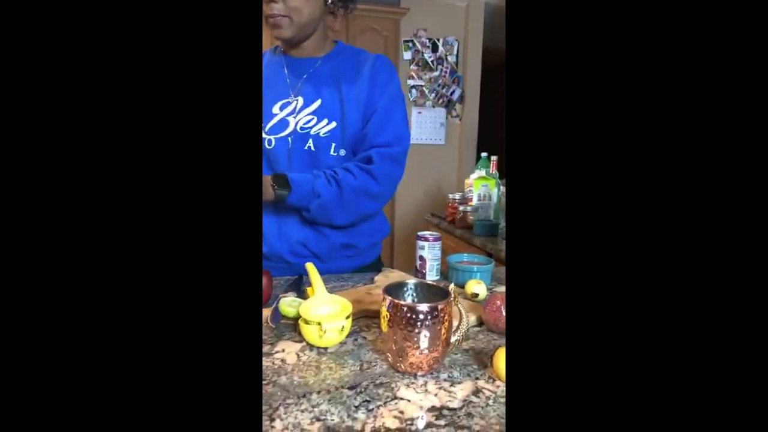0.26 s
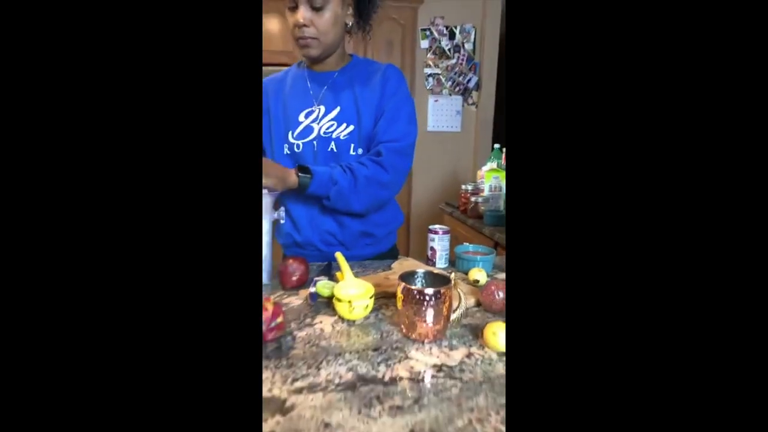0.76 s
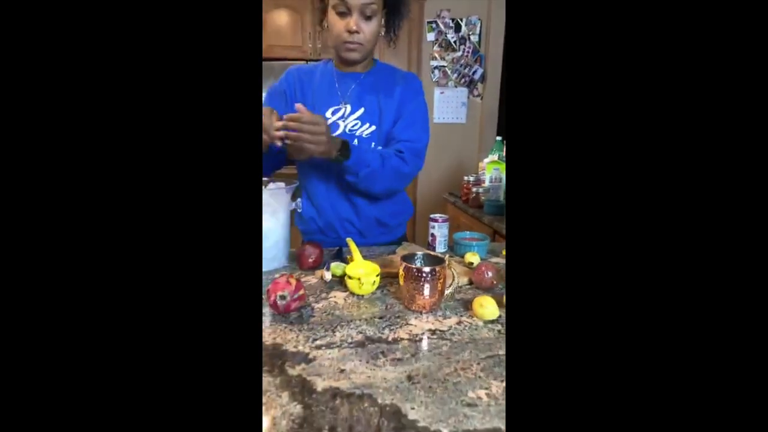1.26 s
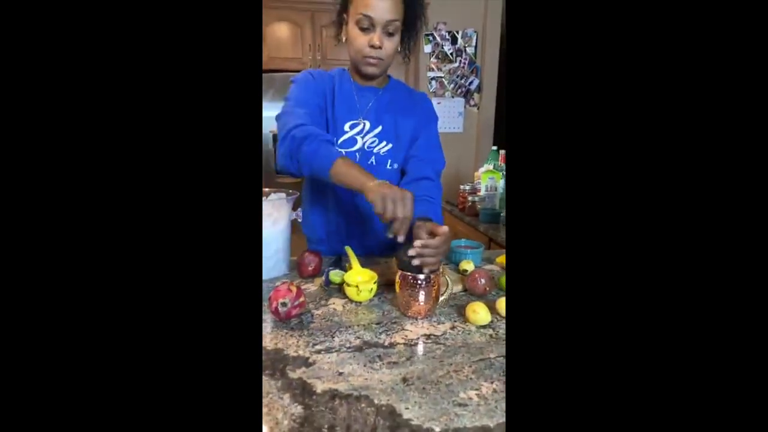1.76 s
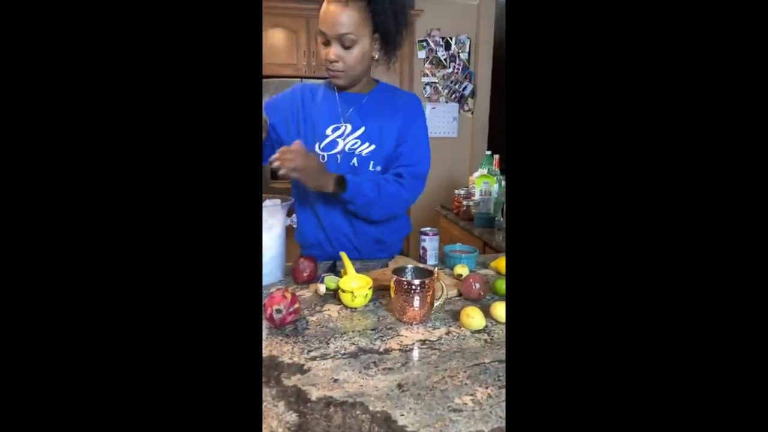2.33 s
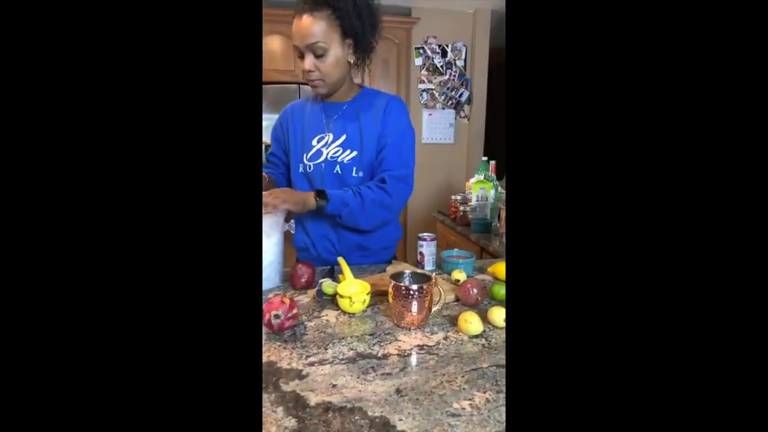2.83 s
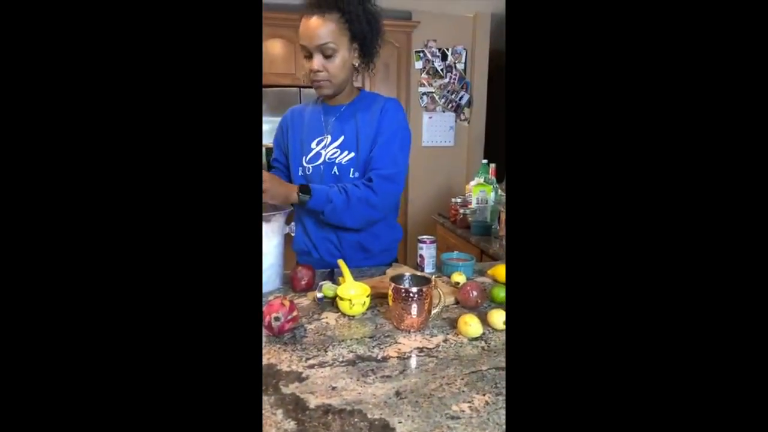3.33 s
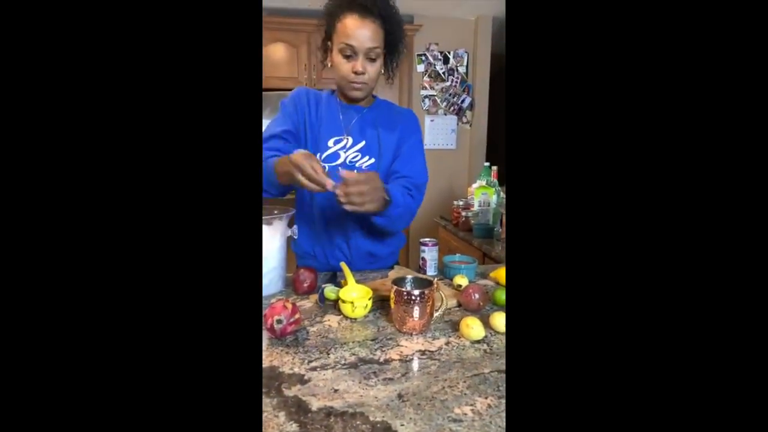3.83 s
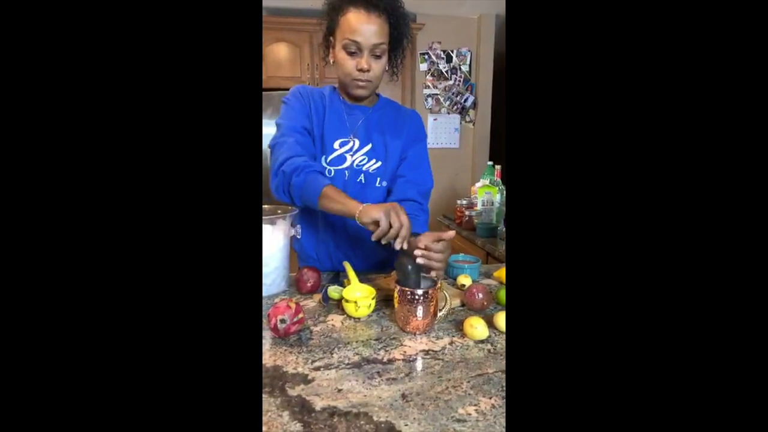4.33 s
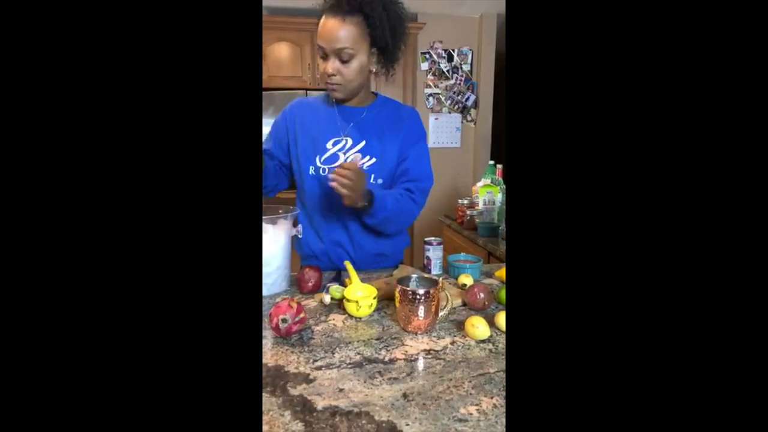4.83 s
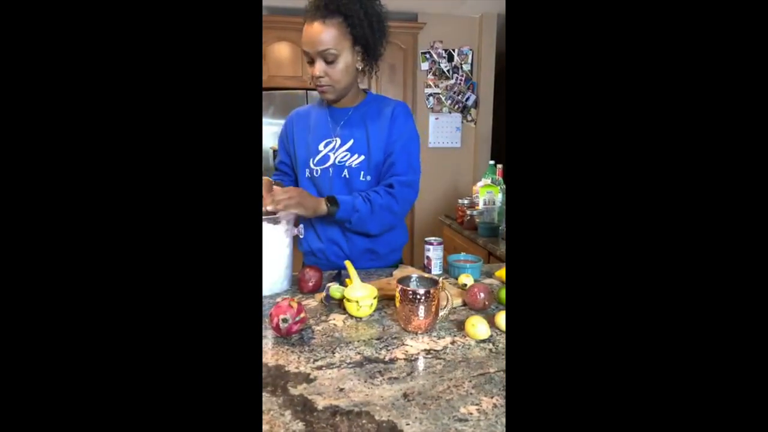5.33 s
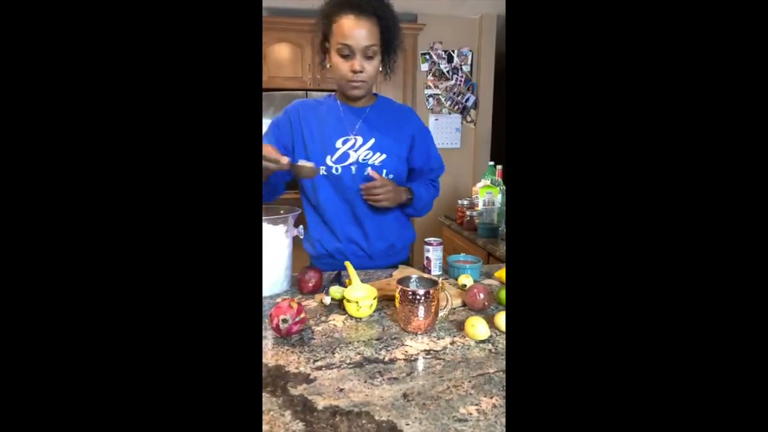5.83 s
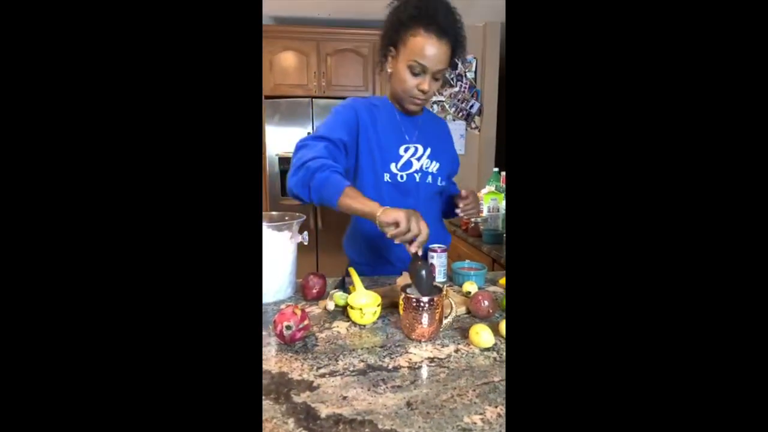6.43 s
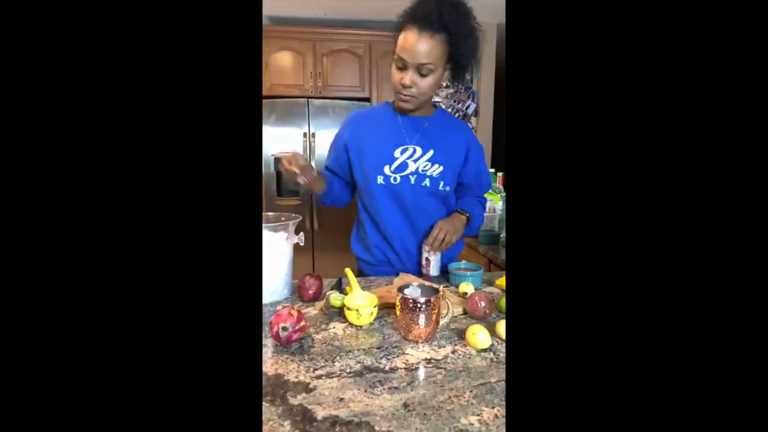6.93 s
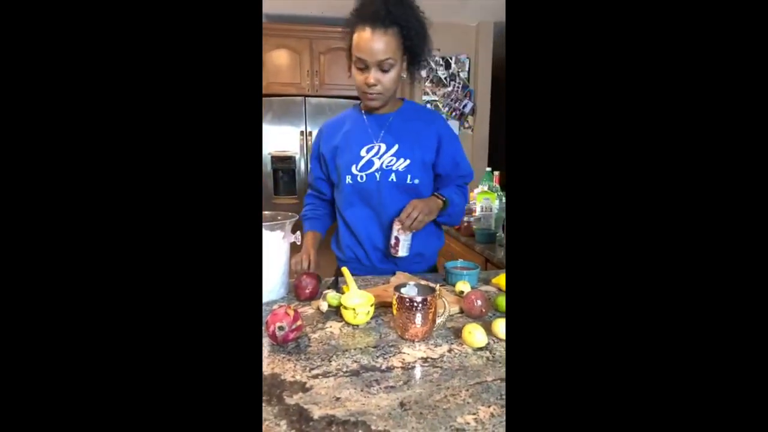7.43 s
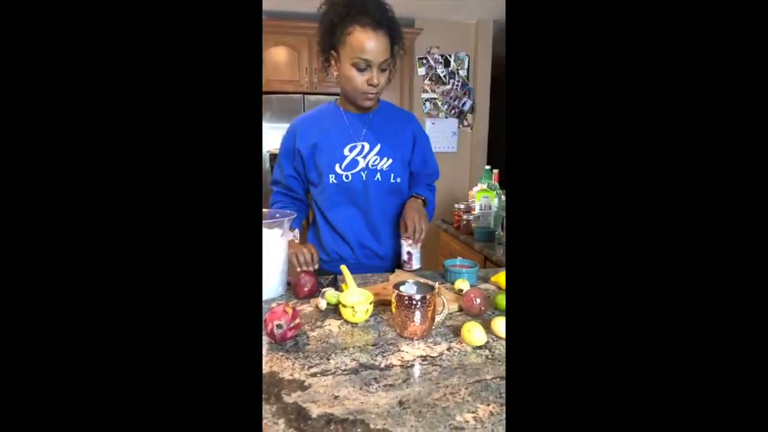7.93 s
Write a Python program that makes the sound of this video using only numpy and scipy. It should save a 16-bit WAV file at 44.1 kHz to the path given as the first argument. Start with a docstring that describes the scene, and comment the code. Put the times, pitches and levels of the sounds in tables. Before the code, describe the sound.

A low, slightly beating appliance hum and soft room rumble run throughout a reflective kitchen. From 0 to about 0.8 s a scoop crunches heavily through packed ice in a bucket a little way off, with cracking cubes and a dull wall boom; a metallic scrape and clank follow at 0.9 s and a small crunch at 1.1. At 1.8-2.1 s cubes clatter into a near, thin metal mug, bright and ringing, with a momentary dropout at the end. Digging resumes at 2.5-3.4 s. The second load hits sharply at 4.2 and rattles until 4.6. Short, crisp digs come at 4.95-5.2, with a faint stir around 5.5. A smaller, duller third load drops at 6.3-6.5, with faint settling ticks until 7. The scoop clanks at 7.3, then lands on the counter at 7.45-7.6 with a squeak and hard metallic knocks, ringing away into hum.

```python
"""A hard kitchen: a bucket of ice stands farther from the microphone than a copper mug on a stone counter.
A metal scoop digs three times into the bucket, carries each load to the mug, tips it in and is laid down.
Crunch, slide and clatter are crowds of small contacts; single blows are noise cracks with ringing modes,
squeals are wavering sines, and the room answers with decaying noise.
Beating appliance tones and shaped noise hum beneath; both channels carry the same sound."""
import sys
import numpy as np
from scipy import signal
from scipy.fft import rfft, irfft
from scipy.io import wavfile
from scipy.ndimage import uniform_filter1d

SR = 44100
rng = np.random.default_rng(int(sys.argv[2]) if len(sys.argv) > 2 else 0)


def waveform_to_disk(signal):
    """Save audio, clipped to [-1, 1], as 16-bit WAV at the path in sys.argv[1]."""
    frames = np.transpose(np.atleast_2d(signal))
    scaled = np.clip(frames, -1, 1) * 32767
    samples = np.round(scaled).astype(np.int16)
    wavfile.write(sys.argv[1], SR, samples)


N = 360297
SPLIT_HZ = 2800  # border between body and treble


def amp(db):
    """Amplitude factor of a level in dB."""
    return 10 ** (np.asarray(db) / 20)


def evened(x):
    """Scale to an rms of 1."""
    return x / np.sqrt(np.mean(x ** 2) + 1e-20)


def read(points, hz):
    """Read a curve between its points, along log frequency."""
    f, value = np.transpose(points)
    return np.interp(np.log(hz + 1), np.log(f + 1), value)


def add(mix, s, sound):
    """Lay a sound into the mix at s seconds, cut off at the end."""
    part = mix[max(round(s * SR), 0):][:len(sound)]
    part += sound[:len(part)]


def colour(x, spectrum):
    """Causal minimum-phase filter with the given spectrum."""
    log_gain = np.log(amp(read(spectrum, abs(np.fft.fftfreq(2048, 1 / SR)))))
    taps = np.fft.ifft(np.exp(np.conj(signal.hilbert(log_gain)))).real
    return signal.fftconvolve(x, taps)[:len(x)]


def halves(x):
    """Treble and body of a sound: sharp corners excite the first, blunt heavy blows the second."""
    filters = [signal.butter(N=4, Wn=SPLIT_HZ, btype=side, fs=SR, output="sos") for side in ("high", "low")]
    return [signal.sosfilt(sos, x) for sos in filters]


def resonate(x, hz, width):
    """A resonance of gain 1 that follows a pitch curve."""
    turn = np.exp(2j * np.pi * np.cumsum(hz * np.ones(len(x))) / SR)
    r = np.exp(-np.pi * width / SR)
    # turn the pitch down to zero, smooth there, turn it back up
    smooth = signal.lfilter([1 - r], [1, -r], x / turn + 1e-18)
    return 2 * (turn * smooth).real


def strokes(rows, column):
    """Gain over time of a series of movements: each builds up, holds, then dies away as the cubes settle."""
    t, gain = np.arange(N) / SR, np.zeros(N)
    for row in rows:
        start, rise, hold, settle = row[:4]
        build_up = np.clip((t - start) / rise, 0, 1)
        fall_db = -20 * np.clip((t - start - rise - hold) / settle, 0, 10)
        gain = np.maximum(gain, amp(row[column]) * build_up * amp(fall_db))
    return gain


def contact(modes, spectrum, crack_s, ring_db, detune):
    """One blow: a short chattering crack, and modes whose strength depends on the spot struck."""
    t = np.arange(SR // 3) / SR
    crack = colour(rng.standard_normal(len(t)) * np.exp(-t / crack_s), spectrum)
    ring = np.zeros(len(t))
    for (hz, db, t60), (spot, shift, turn) in zip(modes, rng.standard_normal((len(modes), 3))):
        wave = np.sin(2 * np.pi * (hz * (1 + detune * shift) * t + turn))
        ring += amp(db + 2 * spot) * evened(wave * amp(-60 * t / t60))
    return evened(crack) + amp(ring_db) * evened(ring)


def blows(rows, body, treble_db, body_db, pitch_db, width_hz, rise_s):
    """Single contacts; the cube and the spot struck favour one bright and one dull pitch."""
    out = np.zeros(N)
    for s, high_db, low_db, bright_hz, dull_hz, *chatter_s in rows:
        levels_db = (high_db + treble_db, low_db + body_db)
        for x, db, hz in zip(halves(body(*chatter_s)), levels_db, (bright_hz, dull_hz)):
            x = evened(x) + amp(pitch_db) * evened(resonate(x, hz, width_hz))
            x = x * (1 - np.exp(-np.arange(len(x)) / SR / rise_s))
            first_10_ms = x[:SR // 100]
            add(out, s, amp(db) * x / first_10_ms.std())
    return out


def jostle(per_s, spread_db):
    """Random collisions of unequal size, of steady power over some hundredths of a second."""
    hits = rng.random(N) < per_s / SR
    sizes_db = spread_db * np.minimum(rng.exponential(1, N), 4)
    sizes = hits * amp(sizes_db) * rng.choice([-1, 1], N)
    power = uniform_filter1d(sizes ** 2, size=1800)
    return sizes / np.sqrt(abs(power) + 0.045 * power.mean())


def rattle(high, low, body, per_s, spread_db, count=10):
    """Many small contacts under gains for treble and body, shared among a number of cubes."""
    clicks, cube, out = jostle(per_s, spread_db), rng.integers(0, count, N), np.zeros(N)
    sounds = [[x / np.linalg.norm(x) for x in halves(body())] for _ in range(count)]
    for i in np.flatnonzero((clicks != 0) & (high > amp(-90))):
        treble, bass = sounds[cube[i]]
        add(out, i / SR, clicks[i] * (high[i] * treble + low[i] * bass))
    return out


# appliance tones: (f/Hz, level/dB, beat against a weaker neighbour f/Hz, neighbour relative level/dB,
# swell centre t/s, swell half-length t/s, swell level/dB, negative where the tone sinks)
APPLIANCE_TONES = [(54.8, -54, 2.9, -8, 5.5, 3.1, 9.5), (75.2, -45.5, 11, -10, 4.9, 1.5, -13),
                   (146.1, -48.5, 18, -13, .4, 3, -10), (169, -55.5, 3.4, -20, 5.6, 1, -19),
                   (220.8, -62, 5, -11, 2, 2, 10), (242, -69, 5.5, -14.5, 7.5, 2.3, 11)]
# still air of the kitchen: (f/Hz, relative level/dB per Hz)
STILL_AIR = [(20, -13), (45, -8), (70, 1.5), (100, -8.5), (135, 1), (200, -7), (310, -7.5), (450, -17),
             (800, -24.5), (2000, -32.5), (7000, -39), (10000, -52.5), (16000, -55.5)]
AIR_DB = -53  # rms level


def hum():
    """Appliance tones beat against weaker neighbours and swell or sink once, over a soft rumble."""
    t = np.arange(N) / SR
    air_gain = amp(read(STILL_AIR, np.fft.rfftfreq(N, 1 / SR)))
    out = amp(AIR_DB) * evened(irfft(rfft(rng.standard_normal(N)) * air_gain, N))
    phases = rng.random((len(APPLIANCE_TONES), 2))
    for (hz, level_db, beat_hz, db, at, span, swell_db), (a, b) in zip(APPLIANCE_TONES, phases):
        pair = np.sin(2 * np.pi * (hz * t + a))
        pair += amp(db) * np.sin(2 * np.pi * ((hz - beat_hz) * t + b))
        out += amp(level_db + swell_db * np.exp(-((t - at) / span) ** 2)) * pair
    return out


# shoves of the scoop through the bucket ice: (start t/s, rise t/s, hold t/s, settling by 20 dB t/s,
# relative force level/dB, weight behind it level/dB)
ICE_SHOVES = [(-.01, .01, .015, .07, -30, 1), (.135, .04, .17, .22, -21, .5), (.44, .07, .08, .35, -26, 0),
              (.88, .05, .1, .2, -39, 1), (1.075, .02, .01, .07, -34, 3),
              (2.462, .008, .09, .25, -22.5, -1.5), (2.63, .075, .035, .2, -21, -1),
              (2.85, .05, .04, .24, -29, -.5), (3.07, .035, .025, .14, -30, 0),
              (3.238, .004, .08, .19, -35, 0), (4.942, .002, .005, .03, -17, -8),
              (4.96, .04, .05, .2, -27, -2), (5.05, .045, .015, .06, -18.5, -3.5),
              (5.11, .02, .01, .3, -29, -2), (5.55, .015, .08, .13, -44, -1)]
# single cubes cracking and knocking in the bucket: (t/s, relative treble level/dB, relative body level/dB,
# bright pitch f/Hz, dull pitch f/Hz)
CUBE_KNOCKS = [(0.0493, -21, -36, 3460, 1960), (0.1372, -30, -34, 7000, 1850),
               (0.1668, -20.5, -23, 6700, 1780), (0.2569, -11.5, -47, 6700, 1640),
               (0.3255, -12.5, -24, 6650, 1290), (0.3672, -10, -18, 4000, 1300),
               (0.5546, -17, -23.5, 5930, 1850), (0.6575, -15, -38, 3530, 1260),
               (1.082, -24, -31.5, 2860, 950), (1.0917, -17, -27.5, 2980, 1430),
               (2.4637, -32, -33, 7100, 1840), (2.5146, -14, -29, 7170, 2790),
               (2.5348, -16, -31, 7200, 1460), (2.7355, -24, -32, 6200, 1570),
               (3.0961, -13, -31.5, 3610, 1680), (3.238, -25, -33.5, 3190, 1570),
               (3.3284, -26, -35, 7320, 1840), (4.9464, -32, -33, 7160, 1620),
               (5.0829, -31, -31, 6100, 1260), (5.0898, -17, -24, 7350, 1480),
               (5.4904, -27, -54, 4140, 1950), (5.5716, -14, -33, 3470, 1270),
               (5.6375, -27, -49, 6640, 1610)]
# ringing modes of the cubes, varied blow by blow: (nominal f/Hz, nominal level/dB, t60/s)
CUBE_MODES = [(1300, -11.5, 0.015), (1792, -9, 0.058), (2490, -6, 0.06), (3542, -5.5, 0.02),
              (4355, -15, 0.06), (5560, -7.5, 0.024), (6520, -4, 0.075), (7170, -1.5, 0.032)]
# colour of a contact on ice: (f/Hz, relative level/dB per Hz)
ICE_CRUNCH = [(120, -33.5), (200, -18.5), (322, 3.5), (373, -14), (558, -12), (635, -4), (950, -2.5),
              (1230, 1.5), (1840, 2), (2210, -6), (6760, -0.5), (8270, -9.5), (10500, -23), (14100, -21),
              (16000, -30)]
# colour of the drumming bucket wall: (f/Hz, relative level/dB per Hz)
BUCKET_BOOM = [(70, -40.5), (135, -1), (220, -10.5), (320, -2), (480, -5.5), (750, -13), (2000, -48.5)]
# dB that crunch body and bucket boom gain for each dB of force and weight
CRUNCH_BODY_LAW, BOOM_LAW = .9, 1.35


def bucket():
    """Packed cubes crunch around the scoop; heavy shoves move more of them and drum on the bucket wall."""
    weighted = [(*timing, force_db + weight_db) for *timing, force_db, weight_db in ICE_SHOVES]
    force, heft = strokes(ICE_SHOVES, column=4), strokes(weighted, column=4)
    crunch = rattle(amp(-8) * force, amp(-16) * heft ** CRUNCH_BODY_LAW,
                    lambda: contact(CUBE_MODES, ICE_CRUNCH, crack_s=0.0019, ring_db=-3.5, detune=0.1143),
                    per_s=800, spread_db=2.3, count=40)
    knocks = blows(CUBE_KNOCKS,
                   lambda: contact(CUBE_MODES, ICE_CRUNCH, crack_s=0.0042, ring_db=-6, detune=.05),
                   treble_db=-14, body_db=-7, pitch_db=3.5, width_hz=860, rise_s=0.00051)
    boom = evened(colour(jostle(per_s=550, spread_db=4.5), BUCKET_BOOM)) * heft ** BOOM_LAW
    return crunch + knocks + amp(-10.5) * boom


# ringing of the kitchen: (f/Hz, t60/s)
ROOM_DECAY = [(150, 0.5), (600, 0.47), (2000, 0.49), (5000, 0.49), (7500, 0.47), (11000, 0.18),
              (16000, 0.57)]


def kitchen(x, wet_db, count=3):
    """Direct sound plus dense reflections of frequency-dependent decay; they shift as arm and scoop move."""
    out, t = x, np.arange(N) / SR
    for k in range(count):
        onset = np.clip(t[:SR] / 0.0034 - .3, 0, 1)  # the first reflections arrive after about 1 ms
        taps = rng.standard_normal(SR) * (rng.random(SR) < .15) * onset
        hz, age, z = signal.stft(taps, SR, nperseg=256)
        decay = amp(-60 * age / read(ROOM_DECAY, hz)[:, None])
        tail = signal.istft(z * decay, SR, nperseg=256)[1]
        # the tails take turns while their summed power stays even
        share = np.sqrt(2 / count) * np.cos(np.pi * (1.7 * t + k / count))
        out = out + amp(wet_db) * signal.oaconvolve(x * share, tail / np.linalg.norm(tail))[:N]
    return out


# the scoop sings on ice or stone: (t/s, length t/s, f/Hz, waver f/Hz, level/dB before the room)
SCOOP_SQUEALS = [(0.649, 0.086, 1300, 40, -42), (.9, 0.029, 5170, 69, -35), (.93, 0.077, 5180, 58, -45.5),
                 (.905, 0.047, 2190, 196, -42), (2.904, 0.051, 6550, 110, -34),
                 (4.943, 0.021, 7040, 230, -28.5), (7.574, .013, 1430, 30, -38.5),
                 (6.28, 0.033, 4880, 150, -41.5), (7.456, 0.03, 1650, 37, -41),
                 (7.497, 0.033, 1500, 60, -47), (6.008, 0.049, 2330, 170, -60),
                 (7.531, 0.1, 1442, 11, -28.5), (7.587, .012, 1452, 14, -23.5)]


def squeals():
    """Stick and slip holds one mode singing, with an unsteady pitch."""
    out = np.zeros(N)
    for s, length, hz, width, db in SCOOP_SQUEALS:
        wobble = evened(uniform_filter1d(rng.standard_normal(SR // 4), size=60))
        wobble = wobble[:max(round(length * SR), 8)]
        tone = np.sin(2 * np.pi * np.cumsum(hz + width * wobble) / SR)
        add(out, s, amp(db) * evened(tone * signal.windows.tukey(len(tone), .2)))
    return out


# ice and other blows on the scoop, the last ones as it is laid down: (t/s, relative treble level/dB,
# relative body level/dB, bright pitch f/Hz, dull pitch f/Hz)
SCOOP_CLANKS = [(.902, -19, -34, 5350, 2170), (1.637, -48, -58, 7000, 1700),
                (1.709, -33.5, -43, 4900, 1500), (3.789, -45, -42.5, 7100, 1650),
                (4.083, -41.5, -44.5, 7000, 1800), (4.184, -21, -34, 4850, 1800),
                (6.284, -27.5, -48, 5000, 2300), (7.3243, -11.5, -24.5, 5250, 1650),
                (7.459, -30, -40, 5950, 2300), (7.5343, -18.5, -31.5, 8100, 1420),
                (7.5832, -10, -16, 7200, 910), (7.592, -13, -32, 7000, 1410),
                (7.6164, -14, -37, 6230, 1850)]
# cubes sliding in the carried scoop, and its last skid on the counter: (start t/s, rise t/s, hold t/s,
# settling by 20 dB t/s, relative treble level/dB, relative body level/dB)
SCOOP_SLIDES = [(1.39, .025, .01, .3, -61, -62), (1.622, .012, .06, .3, -53, -58),
                (3.68, .008, .01, .12, -57, -66), (3.765, .02, .12, .4, -53.5, -52),
                (4.1, .075, .01, .03, -31, -35), (5.99, .04, .01, .08, -55, -59),
                (6.24, .01, .03, .03, -55, -66), (6.27, .02, .06, .06, -37, -48),
                (7.534, .004, .04, .02, -30, -38)]
# ringing modes of the empty scoop, varied blow by blow: (nominal f/Hz, nominal level/dB, t60/s)
EMPTY_SCOOP_MODES = [(915, -9, .07), (1440, -8, .13), (1660, -7, .07), (1850, -7, .05), (3300, -12, .15),
                     (3540, -12, .13), (4850, -8, .08), (5130, -8, .16), (5400, -10, .13), (5980, -7, .22),
                     (6480, -8, .2), (7000, -5, .18), (7350, -5, .18), (7850, -10, .16)]
# the same for the scoop damped by its ice: (nominal f/Hz, nominal level/dB, t60/s)
LOADED_SCOOP_MODES = [(1650, 2, 0.023), (1850, 0, 0.016), (2300, -8.5, 0.09), (5000, -4.5, 0.025),
                      (6260, -8, .02), (7300, -7, 0.052)]
# colour of a contact on the scoop: (f/Hz, relative level/dB per Hz)
SCOOP_CLICK = [(200, -34.5), (550, -3.5), (900, -6), (1200, -1), (1750, 1), (2300, -3.5), (2900, -9),
               (4000, -6), (5000, -5.5), (7400, -2.5), (8700, -9.5), (10500, -23.5), (15500, -28)]


def scoop():
    """Ice slides along the scoop; the empty scoop clanks on bucket and counter."""
    slide = rattle(amp(-4.0) * strokes(SCOOP_SLIDES, column=4), amp(-4.0) * strokes(SCOOP_SLIDES, column=5),
                   lambda: contact(LOADED_SCOOP_MODES, SCOOP_CLICK, crack_s=.003, ring_db=3, detune=.03),
                   per_s=820, spread_db=4.0, count=30)
    clanks = blows(SCOOP_CLANKS,
                   lambda: contact(EMPTY_SCOOP_MODES, SCOOP_CLICK, crack_s=0.0047, ring_db=-3.5, detune=0.0034),
                   treble_db=-14.5, body_db=-6, pitch_db=-3.5, width_hz=290, rise_s=0.00029)
    return slide + clanks


# when each load reaches the mug: t/s
LOAD_TIMES = [1.8, 4.2, 6.3]


def of_load(rows, load):
    """The events that belong to one load of ice: those nearest to it in time."""
    return [row for row in rows if np.argmin(abs(np.array(LOAD_TIMES) - row[0])) == load]


# ringing modes of the mug before ice damps and lowers them, varied blow by blow:
# (nominal f/Hz, nominal level/dB, t60/s)
EMPTY_MUG_MODES = [(470, -15, .14), (1500, -13, .04), (2070, -7, .22), (2160, -7, .14), (2530, -11, .3),
                   (3250, -9, .1), (4130, -17, .3), (4430, -14, .3), (4900, -11, .03), (6060, -5, .07),
                   (6450, -7, .05), (7020, -6, .05), (7370, -3, .06), (7570, -7, .05), (8400, -14, .06),
                   (9150, -17, .08), (9750, -21, .08)]
# colour of a contact on the mug wall: (f/Hz, relative level/dB per Hz)
MUG_WALL_COLOUR = [(200, -16), (450, -5.5), (800, -3.5), (1400, -2), (1850, -2), (2130, -0.5), (2400, -7),
                   (2800, -10.5), (3200, -4.5), (3700, -5), (5500, -6), (6100, -1), (7400, 1), (8600, -8),
                   (10800, -19.5), (15500, -25.5)]


def mug_contact(load, crack_s, ring_db, damping):
    """A blow on the mug; the scoops of ice already inside damp its wall and weigh its modes down."""
    modes = [(hz * (1 - 0.0098 * load), db, t60 / (1 + damping * load * t60))
             for hz, db, t60 in EMPTY_MUG_MODES]
    sound = contact(modes, MUG_WALL_COLOUR, crack_s, ring_db - 1.0 * load, detune=.002)
    # a long clump also builds up slowly
    return sound * (1 - np.exp(-np.arange(len(sound)) / SR / (.25 * crack_s)))


# cubes striking the mug, singly or in clumps: (t/s, relative treble level/dB, relative body level/dB,
# bright pitch f/Hz, dull pitch f/Hz, chatter decay t/s)
MUG_CLINKS = [(1.8072, -17.5, -37.5, 7000, 1290, 0.0077), (1.8306, -13, -23, 7340, 1300, 0.0054),
              (1.8343, -9, -23.5, 7000, 2060, 0.0044), (1.866, -24, -33, 7000, 420, .008),
              (1.895, -14, -33, 7440, 2090, 0.014), (1.9285, -11, -29.5, 7640, 2100, 0.0085),
              (1.9714, -13, -34, 7600, 640, .007), (1.991, -9.5, -45, 7330, 2050, 0.01),
              (2.0537, -14.5, -31, 7850, 790, 0.014), (4.2085, -6, -16.5, 6150, 1480, .004),
              (4.2127, -8.5, -24.5, 5860, 1520, 0.0042), (4.2455, -8.5, -26, 7000, 1400, 0.01),
              (4.3035, -11.5, -29.5, 6500, 1800, 0.02), (4.349, -9.5, -30, 6370, 724, .016),
              (4.442, -11, -32, 6600, 2070, 0.0041), (4.5515, -27, -48, 7400, 810, 0.018),
              (4.584, -10.5, -35, 7050, 790, .003), (4.8303, -45, -52, 6260, 800, .007),
              (6.319, -16, -39, 4930, 900, .004), (6.398, -23, -42, 6450, 1770, .014),
              (6.4588, -15.5, -36, 7400, 775, .005), (6.4674, -22, -45, 3550, 760, 0.0046),
              (6.6448, -37, -51, 6330, 1500, .014), (6.7146, -35, -47, 3960, 800, 0.0069),
              (6.7264, -29, -47, 7300, 765, .007), (6.7915, -37, -41.5, 3300, 2030, 0.0055),
              (6.865, -54, -53, 6000, 480, .01), (6.9296, -40, -47.5, 6160, 810, .008),
              (7.0115, -48, -51.5, 6200, 826, 0.0087)]
# each load tumbling into the mug, and cubes settling after the last: (start t/s, rise t/s, hold t/s,
# settling by 20 dB t/s, relative treble level/dB, relative body level/dB)
MUG_POURS = [(1.83, .03, .04, .1, -27.5, -28), (1.95, .02, .11, .02, -31, -40),
             (4.21, .02, .07, .2, -28, -31.5), (4.41, .035, .004, .03, -28, -29),
             (4.5, .04, .01, .03, -39, -45), (6.385, .01, .05, .03, -35, -35),
             (6.44, .02, .005, .02, -22, -33), (6.68, .03, .02, .14, -46, -48),
             (6.82, .06, .12, .05, -60, -53)]
# air in the mug rings low under scoop and hand, and glides as its mouth clears; one row a load:
# (start t/s, length t/s, from f/Hz, to f/Hz, gain level/dB)
MUG_CAVITY = [(1.87, .18, 635, 810, 13), (4.24, .22, 615, 815, 14.5), (6.3, .15, 820, 790, 16.5)]


def mug():
    """Cubes fall into the thin copper mug and ring its wall and the air inside."""
    out, t = np.zeros(N), np.arange(N) / SR
    for load, (start, length, from_hz, to_hz, air_db) in enumerate(MUG_CAVITY):
        pour = of_load(MUG_POURS, load)
        wall = rattle(amp(-7.5) * strokes(pour, column=4), amp(-10.5) * strokes(pour, column=5),
                      lambda: mug_contact(load, crack_s=0.002, ring_db=-2, damping=4.6),
                      per_s=380, spread_db=1.5, count=14)
        wall += blows(of_load(MUG_CLINKS, load),
                      lambda chatter_s: mug_contact(load, chatter_s, ring_db=-4.5, damping=3.1),
                      treble_db=-16, body_db=-8.5, pitch_db=1.5, width_hz=410, rise_s=.0002)
        air_hz = np.interp(t, [start, start + length], [from_hz, to_hz])
        out += wall + amp(air_db) * resonate(wall, air_hz, width=46)
    return out


def scene():
    """The bucket stands farther off than the mug, so more room answers it; both channels are the same."""
    mono = hum() + kitchen(bucket(), wet_db=-0.5)
    mono += kitchen(squeals(), wet_db=-11.5) + kitchen(scoop(), wet_db=-2)
    mono += kitchen(mug(), wet_db=-6)
    return np.array([mono, mono])


# the sound cuts out for an instant: (from t/s, to t/s)
CUTS = [(2.092, 2.111), (3.205, 3.212), (6.503, 6.516)]
EDGE_HZ = 16200  # upper band limit


def record(dry):
    """The sound cuts out three times for an instant; then a steep low-pass limits the band."""
    t = np.arange(N) / SR
    live = 1. - sum((t > start) & (t < end) for start, end in CUTS)
    gated = dry * uniform_filter1d(live, size=30)
    low_pass = signal.firwin(511, EDGE_HZ, window=("kaiser", 9), fs=SR)
    return signal.oaconvolve(gated, low_pass[None], "same")


dry = scene()
out = record(dry)
waveform_to_disk(out)
```